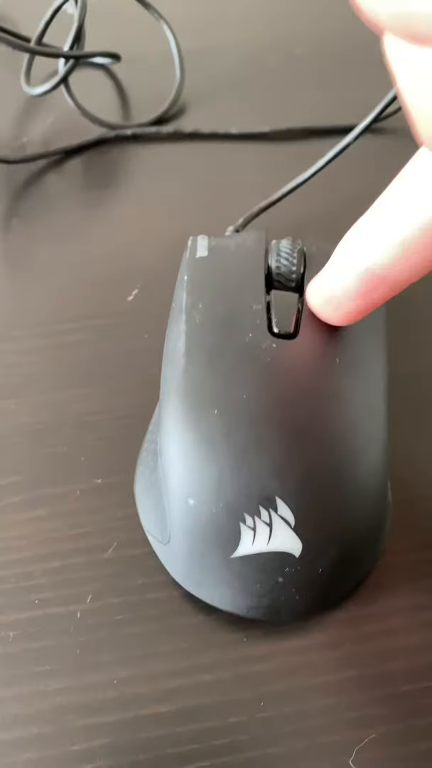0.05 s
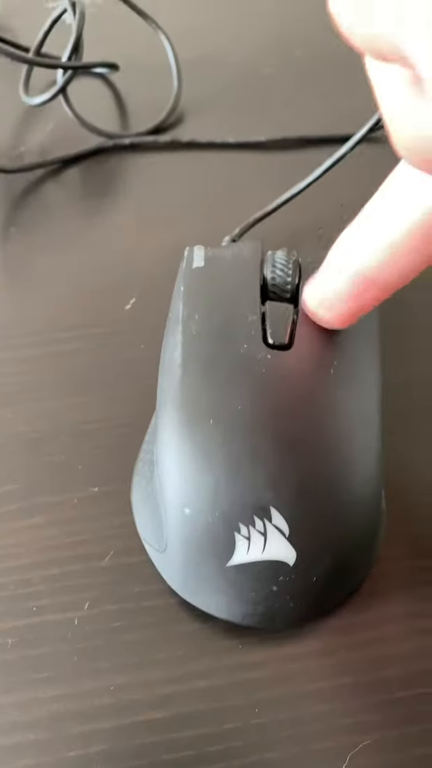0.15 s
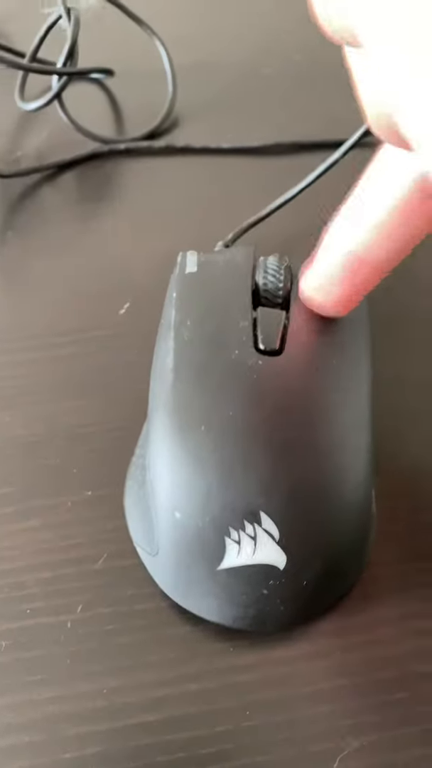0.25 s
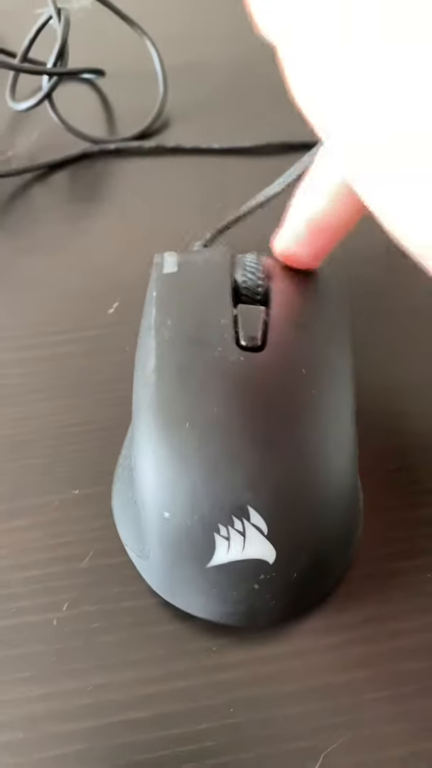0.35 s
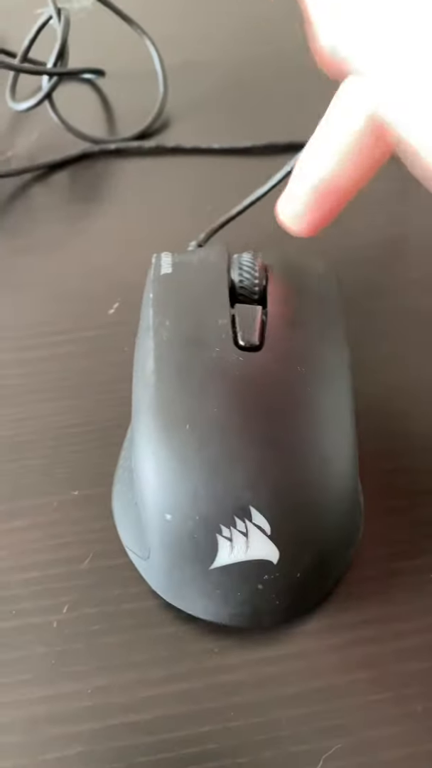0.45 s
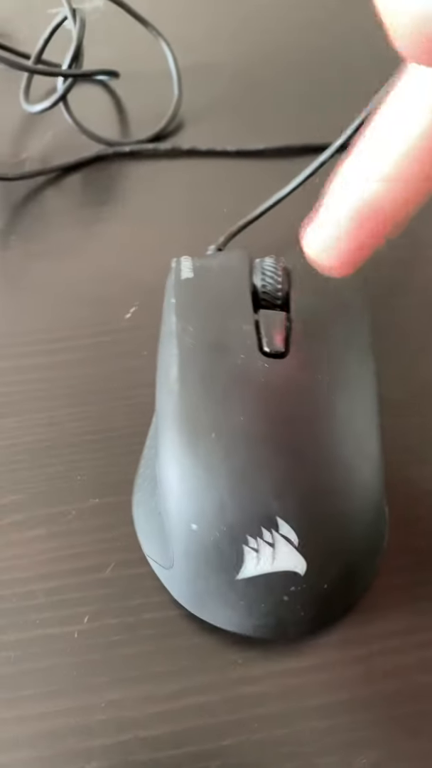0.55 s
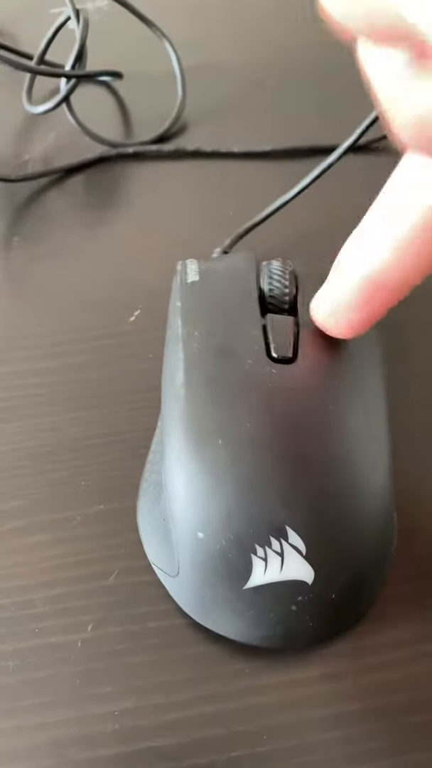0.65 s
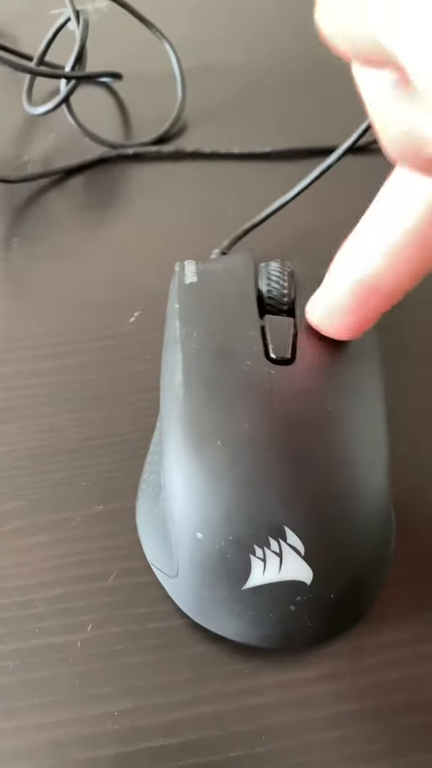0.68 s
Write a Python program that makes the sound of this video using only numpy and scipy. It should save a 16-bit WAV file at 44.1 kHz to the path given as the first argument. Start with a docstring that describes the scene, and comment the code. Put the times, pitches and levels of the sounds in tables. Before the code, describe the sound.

Bright, crisp mouse clicks in quick bursts, with hollow plastic taps and faint low desk thuds

```python
"""A wooden desk in a small quiet room: a finger clicks a plastic mouse button, close to two spaced microphones.
The clicks come in four quick flurries. Shaped noise bursts make the bright switch snaps and hard finger ticks;
noise and detuned decaying modes make the hollow shell, grainy noise the rub of the fingertip.
Harder blows drive the desk top's modes, and pushes of the hand set its frame swaying.
The room rings briefly after each click, above a faint bed of air."""
import sys
import numpy as np
from scipy import signal
from scipy.fft import rfft, irfft, next_fast_len
from scipy.io import wavfile
from scipy.ndimage import uniform_filter1d

SR = 44100
rng = np.random.default_rng(int(sys.argv[2]) if len(sys.argv) > 2 else 0)


def to_wav(sig):
    """Store sig (one row per channel, or 1-D mono) as 16-bit WAV at the path in sys.argv[1].

    Samples outside -1..1 are clipped; the rate is SR.
    """
    pcm = np.clip(np.atleast_2d(sig), -1, 1) * 32767
    pcm = np.round(pcm).astype(np.int16)
    wavfile.write(sys.argv[1], SR, pcm.T)  # frames by channels


N = 99225
T = np.arange(N) / SR
FREQS = np.arange(N + 1) * SR / (2 * N)  # Hz, for spectra of length 2 N

# spectrum of hard ticks, shared by the plunger's scrape [f/Hz, relative level/dB]
TICK_COLOUR = [(200, -2.5), (800, -2), (1500, -8.5), (2500, -1.5), (3700, -4.5), (5300, 2), (6600, 3.5),
               (8000, -3), (10000, -4.5), (12500, -13.5), (16000, -21.5)]

# shell: decay times and layer levels
TICK_T60_S, TICK_DB, SHELL_T60_S, SHELL_DB, MODES_DB = 0.005, -2, 0.034, -2.5, -10.5
REBOUND_S, REBOUND_DB = 0.0019, -8.5  # nominal gap, level step from one rebound to the next
GRIP_DETUNE = 0.038  # typical share by which the grip detunes each mode
SPOT_DB, SPOT_OCTAVES = 7.5, 0.35  # lift of modes near the favoured pitch, and its reach
# desk top and frame
KNOCK_DB, THUD_T60_S, THUD_DB, FRAME_DB = -6.5, 0.081, -2, -1.5
# fingertip: slips are tried at this rate and kept only while the finger rubs
SLIPS_PER_S, SLIP_DB, SLIP_RANGE_DB, RUB_DB = 220, -6, 13, -1.5
# switch: the hold times count from the start of the rise
SNAP_RISE_S, SNAP_HOLD_S, SNAP_T60_S, SNAP_DB = 0.00055, 0.0014, 0.0057, -5.5
SNAP_SCATTER_DB = 3  # how much the colour differs from snap to snap
TRAVEL_S, TRAVEL_T60_S, TRAVEL_DB = 0.0024, 0.022, -20  # plunger's lead on the snap, decay, level
# room, air and recorder
EARLY_T60_S, EARLY_DB, AIR_DB, TOP_HZ = 0.01, -15.5, -73.5, 16500


def undb(db):
    """Decibels to gain."""
    return 10 ** (np.asarray(db) / 20)


def lookup(points, hz):
    """Read a table on a log-frequency axis."""
    p = np.array(points, float)
    return np.interp(np.log(np.maximum(hz, 1)), np.log(p[:, 0]), p[:, 1])


def shape(x, gain):
    """Filter by a response over FREQS."""
    return irfft(rfft(x, 2 * N) * gain)[..., :N]


def colour(x, points):
    """Causal minimum-phase filter of unit power with the given spectrum, made by folding the cepstrum."""
    gain = undb(lookup(points, FREQS))
    cepstrum = irfft(np.log(gain / np.sqrt(np.mean(gain ** 2))))
    cepstrum[1:N] *= 2
    cepstrum[N + 1:] = 0
    return shape(x, np.exp(rfft(cepstrum)))


def fade(t, t60):
    """Exponential decay by 60 dB in t60 seconds."""
    return np.exp(-np.log(1000) * t / t60)


def burst(t60, rise=0.0002, hold=0., count=4):
    """Brief chatter of a contact: random in detail, even in spectrum."""
    t = T[:next_fast_len(int((hold + t60) * SR) + 64)]
    env = np.minimum(t / rise, 1) * fade(np.maximum(t - hold, 0), t60) + 1e-9
    x = rng.standard_normal(max(len(t), N // 16))[:len(t)] * env
    # alternately flatten the spectrum and restore the envelope
    for _ in range(count):
        x = irfft(np.exp(1j * np.angle(rfft(x))), len(t))
        local_rms = np.sqrt(np.abs(uniform_filter1d(x ** 2, size=24)) + 1e-12)
        x = x * env / local_rms
    return x


def add(track, s, sound):
    """Mix a sound in at time s."""
    i = int(np.clip(s * SR, 0, N - 1))
    track[i:i + len(sound)] += sound[:N - i]


def play(events, sound):
    """One call of the sound for each (s, dB) row."""
    track = np.zeros(N)
    for s, db in events:
        add(track, s, undb(db) * sound())
    return track


def ring(modes):
    """Sum of decaying modes, pushed downwards at the start."""
    return -sum(undb(db) * np.sin(2 * np.pi * hz * T) * fade(T, t60) for hz, db, t60 in modes)


def tick(count=2):
    """A hard contact followed by small, unevenly spaced rebounds."""
    out, s = np.zeros(N), 0
    add(out, 0, burst(TICK_T60_S, count=2))
    for k in range(count):
        s += REBOUND_S * rng.uniform(0.55, 1.7)
        add(out, s, undb(REBOUND_DB * (k + 0.5)) * burst(TICK_T60_S, count=2))
    return out


def gripped(spot_hz, scatter_db=3):
    """The shell's modes shift in pitch and strength with the place and grip of the finger."""
    # modes of the hollow plastic shell [f/Hz, relative level/dB, t60/s]
    shell_modes = [(495, -2.5, 0.076), (590, -7, 0.06), (712.6, -4, 0.058), (801, -0.5, 0.029),
                   (867, -1, 0.052), (992, -5, 0.024), (1250, -9.5, 0.032), (1436, -10, 0.04),
                   (2281, -3.5, 0.038), (2950, -7, 0.043), (4140, -5, 0.013), (5330, 6, 0.018)]
    hz, db, t60 = np.array(shell_modes).T
    detune, strength = rng.standard_normal((2, len(hz)))
    lift = SPOT_DB * np.exp(-(np.log2(hz / spot_hz) / SPOT_OCTAVES) ** 2)
    mode_hz = hz * (1 + GRIP_DETUNE * detune)
    mode_db = db + lift + scatter_db * strength
    t = T[:N // 16]
    out = np.zeros(len(t))
    for k, (f, level, decay) in enumerate(zip(mode_hz, mode_db, t60)):
        out += (-1) ** k * undb(level) * np.sin(2 * np.pi * f * t) * fade(t, decay)
    return out


def shell():
    """Each tap is a hard tick and a short hollow ring of the plastic, coloured by the spot that is struck."""
    # finger and button striking the shell
    # [t/s, relative tick level/dB, relative hollow body level/dB, favoured f/Hz]
    taps = [(0.073, -47, -59, 772), (0.1162, -39, -49.5, 488), (.163, -34.5, -45.5, 734),
            (.225, -43, -42.5, 484), (0.272, -35, -41, 730), (0.3494, -21.5, -32, 677),
            (.364, -52, -41, 950), (0.3798, -34.5, -27.5, 628), (.412, -43, -33.5, 920),
            (.694, -36.5, -37, 710), (.736, -34.5, -45.5, 717), (0.754, -28.5, -39, 728),
            (0.8021, -18.5, -28, 875), (0.842, -35.5, -52, 700), (.869, -25.5, -41, 687),
            (0.888, -37.5, -36, 715), (.916, -30, -38.5, 810), (.924, -27.5, -40, 840),
            (.965, -36, -39, 710), (1.156, -29, -49.5, 530), (1.209, -34, -57, 500),
            (1.217, -32, -48.5, 495), (1.2232, -36, -44.5, 600), (1.2773, -32, -36.5, 865),
            (1.2827, -30.5, -31, 870), (1.33, -32.5, -46.5, 526), (1.3675, -44, -44.5, 710),
            (1.3788, -23.5, -41.5, 715), (1.461, -32.5, -45.5, 790), (1.476, -35, -43.5, 870),
            (1.7233, -40, -43.5, 490), (1.747, -28, -42, 477), (1.784, -38, -48.5, 730),
            (1.8925, -37.5, -57.5, 705), (1.973, -26, -43, 855), (2.2371, -41.5, -50.5, 576)]
    # spectrum of the hollow body [f/Hz, relative level/dB]
    shell_colour = [(100, -8), (300, -6), (550, -3), (850, -3.5), (1300, -10), (1800, -8), (2500, -13.5),
                    (3700, -19.5), (5500, -17.5), (8000, -20.5), (16000, -39.5)]
    ticks = play([(s, db) for s, db, _, _ in taps], tick)
    body = play([(s, db) for s, _, db, _ in taps], lambda: burst(SHELL_T60_S, rise=0.002))
    rings = np.zeros(N)
    for s, _, db, spot_hz in taps:
        add(rings, s, undb(db) * gripped(spot_hz))
    hard = undb(TICK_DB) * colour(ticks, TICK_COLOUR)
    hollow = undb(SHELL_DB) * colour(body, shell_colour)
    return hard + hollow + undb(MODES_DB) * rings


def desk():
    """Knocks thud and ring the wooden top; a longer, softer contact leaves only the low modes."""
    # blows through the mouse into the desk top [t/s, relative level/dB, contact time/s]
    knocks = [(.165, -49, 0.0011), (0.22, -45.5, 0.00053), (.273, -43.5, 0.00082), (0.36, -33.5, 0.0021),
              (0.383, -21.5, 0.0009), (0.403, -35.5, 0.0034), (.419, -37, 0.0011), (.698, -39, 0.0011),
              (0.758, -40.5, 0.0018), (0.808, -31, 0.0038), (.841, -34.5, 0.002), (.853, -26, 0.0067),
              (.885, -38, .002), (0.967, -45, 0.0013), (1.157, -47, 0.0015), (1.224, -45.5, .0015),
              (1.287, -36.5, 0.0021), (1.321, -44, 0.0034), (1.38, -43, 0.0036), (1.418, -39.5, 0.0017),
              (1.755, -45, 0.00073), (1.829, -44.5, 0.00084), (1.975, -45.5, 0.00097)]
    # modes of the desk top [f/Hz, relative level/dB, t60/s]
    top_modes = [(100.9, -5, .24), (150.5, -9.5, 0.39), (177.4, -10, 0.25), (217.5, -11, 0.092),
                 (262.5, -2, 0.2), (310, -6, 0.083), (369.5, -8, 0.22), (482, -6.5, 0.14), (643, -9, 0.072),
                 (790, -9.5, 0.12), (875, -15.5, .1)]
    # spectrum of the dull thud [f/Hz, relative level/dB]
    thud_colour = [(40, -20), (70, -2), (105, 7.5), (170, 4.5), (280, -1.5), (500, -5), (900, -20),
                   (2000, -38), (16000, -64.5)]
    pushes, thuds = np.zeros(N), np.zeros(N)
    for s, db, contact_s in knocks:
        push = np.hanning(max(int(contact_s * SR), 3))
        push = undb(db) * push / push.sum()
        add(pushes, s - contact_s / 2, push)
        add(thuds, s - contact_s / 2, np.convolve(burst(THUD_T60_S, rise=0.0016), push))
    ringing = shape(pushes, rfft(ring(top_modes), 2 * N))
    return undb(KNOCK_DB) * ringing + undb(THUD_DB) * colour(thuds, thud_colour)


def fingertip(grain_db=4, low_hz=500, high_hz=1500):
    """Skin catches and slips on the matt plastic: a grainy rub, with tiny slips that ring the shell."""
    # fingertip sliding on the button [start t/s, length/s, relative level/dB]
    rubs = [(0.204, 0.031, -54), (0.26, 0.043, -55.5), (0.331, 0.042, -51), (0.681, 0.0096, -56),
            (0.792, 0.11, -49.5), (1.143, 0.013, -56.5), (1.288, 0.17, -54), (1.7, 0.01845, -54),
            (1.803, 0.15, -53), (1.964, 0.01, -48.5), (2.221, 0.038, -64.5)]
    # spectrum of the smoother rub [f/Hz, relative level/dB]
    rub_colour = [(100, -3), (350, 1.5), (750, -3), (1400, -7.5), (2600, -10.5), (4500, -19), (6500, -10),
                  (8000, -14), (12000, -18), (16000, -27)]
    # the grain changes level every 128 samples
    grain_levels = np.repeat(rng.standard_normal(N // 128 + 1), 128)[:N]
    grains = rng.standard_normal(N) * undb(grain_db * grain_levels)
    pressure = np.zeros(N)
    for s, length, db in rubs:
        stroke = np.clip((T - s) / length, 0, 1)
        pressure += undb(db) * np.sqrt(np.abs(np.sin(np.pi * stroke)))
    slips = np.zeros(N)
    for when, spot, size in rng.random((int(SLIPS_PER_S * N / SR), 3)):
        if pressure[int(when * N)] > 1e-6:
            spot_hz = low_hz + spot * (high_hz - low_hz)
            add(slips, when * N / SR, undb(-SLIP_RANGE_DB * size) * gripped(spot_hz))
    slips = slips / slips[pressure > pressure.mean()].std()
    rub = colour(grains / grains.std() * pressure, rub_colour)
    return undb(RUB_DB) * rub + undb(SLIP_DB) * pressure * slips


def snap(count=20):
    """One flip of the spring, its resonances weighted a little differently each time."""
    x = burst(SNAP_T60_S, SNAP_RISE_S, SNAP_HOLD_S, count=3)
    spectrum = rfft(x, 2 * len(x))
    bands = np.linspace(0, count - 1, len(spectrum))
    scatter = np.interp(bands, np.arange(count), rng.standard_normal(count))
    gain = undb(SNAP_SCATTER_DB * scatter)
    return irfft(spectrum * gain / np.sqrt(np.mean(gain ** 2)))[:len(x)]


def switch():
    """The leaf spring flips and chatters for a millisecond; the plunger scrapes faintly as it travels."""
    # switch snaps, down and up [t/s, relative level/dB]
    snap_events = [(0.2172, -21.5), (0.273, -22), (0.3449, -18), (0.409, -19.5), (0.6909, -19.5),
                   (0.7528, -18.5), (0.7967, -21), (0.8007, -24), (0.8528, -23.5), (0.86, -20.5),
                   (0.8686, -31), (0.892, -18), (0.9172, -21), (0.9225, -33), (0.9656, -18), (1.156, -20),
                   (1.2172, -22.5), (1.2762, -19.5), (1.3286, -22.5), (1.3675, -21), (1.3777, -30),
                   (1.4599, -21), (1.7116, -22.5), (1.7468, -23), (1.7853, -18), (1.974, -18.5)]
    # spectrum of the snap [f/Hz, relative level/dB]
    snap_colour = [(300, -30.5), (2000, -28.5), (5000, -17.5), (5800, -19), (6500, -1), (7000, 4.5),
                   (7500, -13.5), (8000, -4.5), (8600, -20), (9400, -5), (11200, -12.5), (12400, -13.5),
                   (13500, -2.5), (14300, -19), (15400, -9), (16500, -37.5)]
    snaps = play(snap_events, snap)
    travel_events = [(s - TRAVEL_S, db) for s, db in snap_events]
    travel = play(travel_events, lambda: burst(TRAVEL_T60_S, TRAVEL_S, TRAVEL_S, count=1))
    return undb(SNAP_DB) * colour(snaps, snap_colour) + undb(TRAVEL_DB) * colour(travel, TICK_COLOUR)


def frame():
    """The desk sways on its legs after every push."""
    # weight of the hand rocking the whole desk [t/s, relative level/dB]
    push_events = [(.227, -47.5), (.356, -35), (.377, -34), (.72, -35), (.807, -36), (.826, -32),
                   (.977, -44.5), (1.208, -40), (1.306, -33.5), (1.356, -43.5), (1.406, -37),
                   (1.427, -37.5), (1.738, -36), (1.947, -42.5)]
    # modes of the desk frame [f/Hz, relative level/dB, t60/s]
    frame_modes = [(38.65, 1.5, 0.69), (95, -13.5, 0.62)]
    sway = ring(frame_modes)
    return undb(FRAME_DB) * play(push_events, lambda: sway)


def room(x, onset_s=0.0065):
    """Quick reflections from the desk, then a diffuse tail that differs left and right."""
    # decay of the room [f/Hz, t60/s]
    room_t60 = [(150, 0.5), (350, 0.19), (800, 0.18), (3000, 0.19), (7000, 0.2), (15000, 0.17)]
    # level of the tail against the direct sound [f/Hz, level/dB]
    room_colour = [(60, -33), (130, -22.5), (300, -8.5), (550, 0.5), (800, -3), (2500, -6.5), (5000, -9.5),
                   (7000, -20), (8000, -25.5), (10000, -9.5), (13500, -21), (16000, -18)]
    noise = rng.standard_normal((2, N))
    tail = 0
    for k, (_, t60) in enumerate(room_t60):
        # overlapping bands, each peaking at its own row of the table
        band = lookup([(hz, j == k) for j, (hz, _) in enumerate(room_t60)], FREQS)
        env = fade(T, t60) * np.minimum(T / onset_s, 1)
        tail = tail + shape(noise, band) * env / np.linalg.norm(env)
    near = fade(T, EARLY_T60_S) * np.minimum(T / 0.0031, 1)
    early = rng.standard_normal((2, N)) * near / np.linalg.norm(near)
    late_response = rfft(tail, 2 * N) * undb(lookup(room_colour, FREQS))
    return shape(x, late_response + undb(EARLY_DB) * rfft(early, 2 * N))


def scene():
    """Mouse and desk reach two spaced microphones, with the room and its faint air."""
    # how far the left microphone leads the right [f/Hz, phase/rad]
    left_lead = [(20, 0), (200, .08), (700, .35), (2000, .6), (5400, 1.0), (6200, 2.0), (7200, 3.1),
                 (10000, 5.9), (11800, 7.3), (13300, 9.2), (15000, 10.5), (16000, 12)]
    # left minus right for shell, fingertip and desk top [f/Hz, level/dB]
    body_balance = [(60, 1.5), (130, -1.5), (300, -5), (700, -13), (1400, 1.5), (2600, -7), (5000, -3),
                    (6500, 1.5), (16000, 0)]
    # spectrum of the room's air [f/Hz, relative level/dB]
    air_colour = [(25, 5), (60, 2.5), (100, -2.5), (200, -14.5), (350, -14.5), (415, -8.5), (500, -21.5),
                  (1200, -27), (4000, -32), (11000, -42.5), (16000, -51)]
    body = shell() + desk() + fingertip()
    snaps = switch()
    sides = np.array([[1], [-1]]) / 2  # half of each difference to either side
    lead = np.exp(1j * sides * lookup(left_lead, FREQS))
    balance = undb(sides * lookup(body_balance, FREQS))
    direct = shape(snaps, lead) + shape(body, lead * balance)
    # part of the air is common to both microphones
    air_noise = rng.standard_normal(N) + 1.5 * rng.standard_normal((2, N))
    air = undb(AIR_DB) * colour(air_noise, air_colour)
    return direct + room(snaps + body) + frame() + air


def record(dry):
    """The recorder cuts the deepest bass and the top."""
    dry = signal.sosfilt(signal.butter(2, 30, "high", fs=SR, output="sos"), dry)
    return signal.sosfilt(signal.ellip(8, .2, 70, TOP_HZ, fs=SR, output="sos"), dry)


dry = scene()
out = record(dry)
to_wav(out)
```